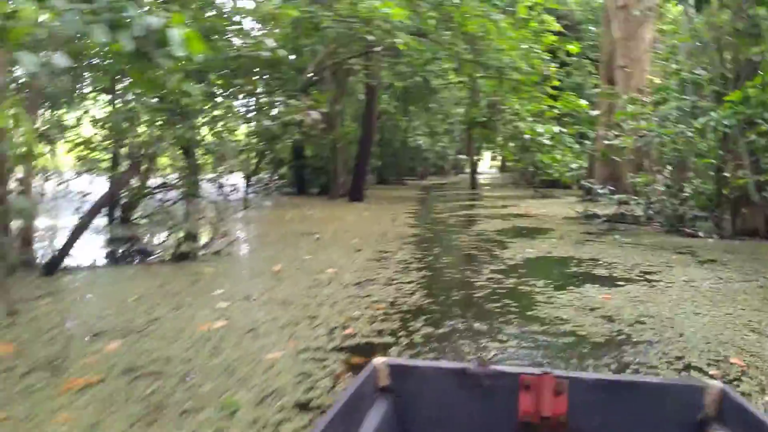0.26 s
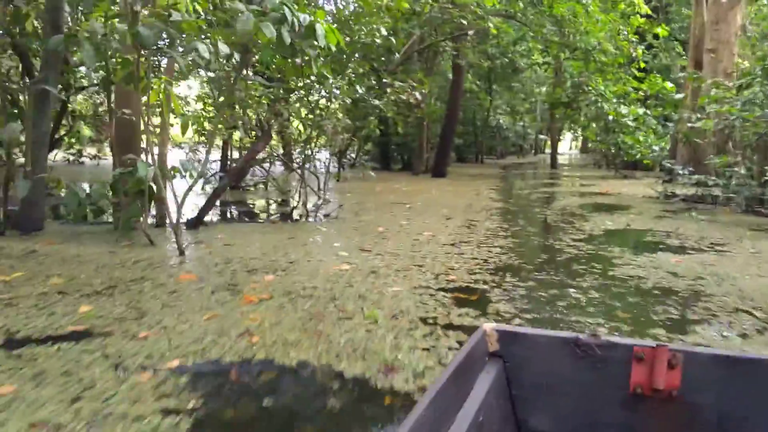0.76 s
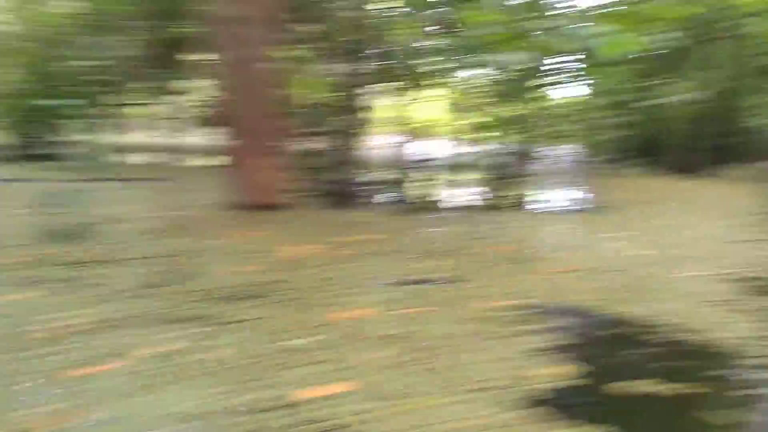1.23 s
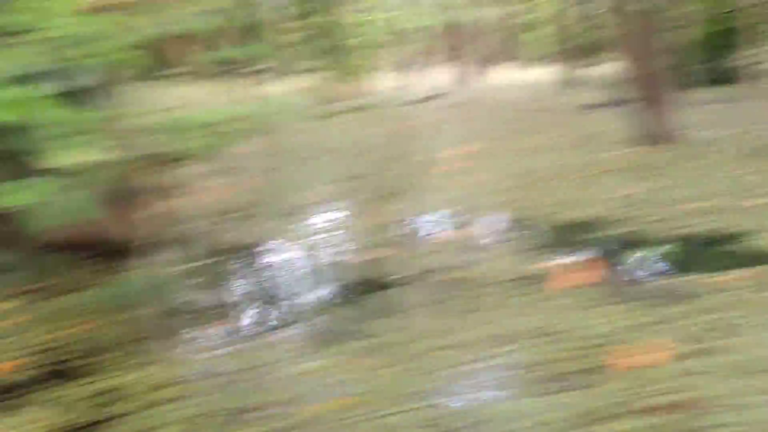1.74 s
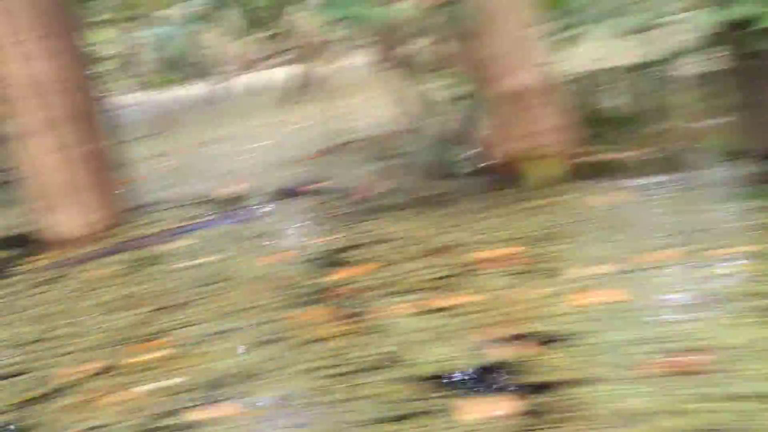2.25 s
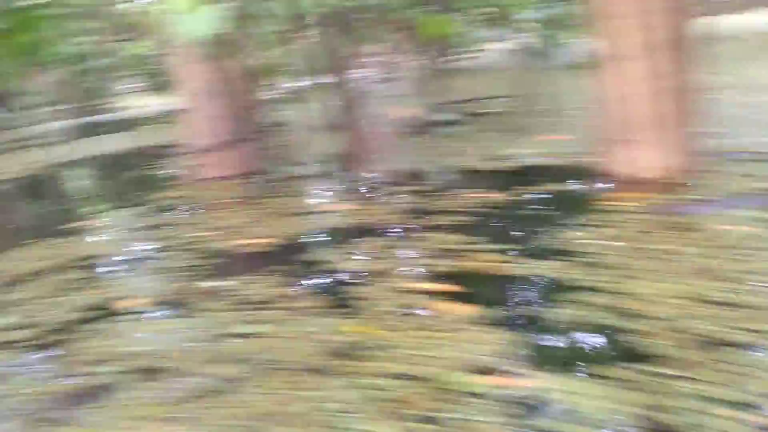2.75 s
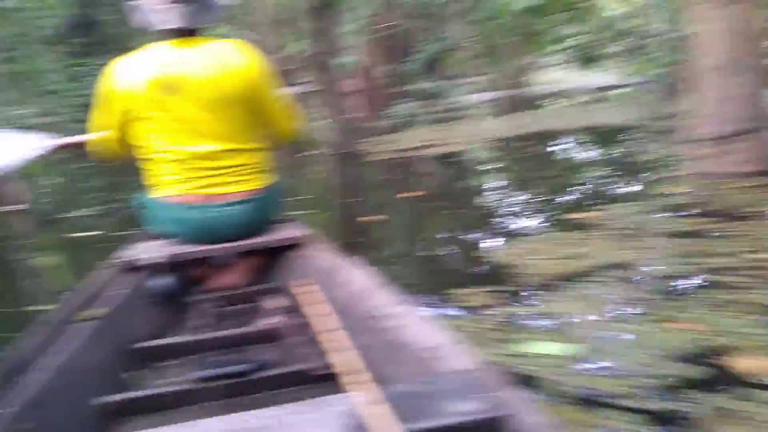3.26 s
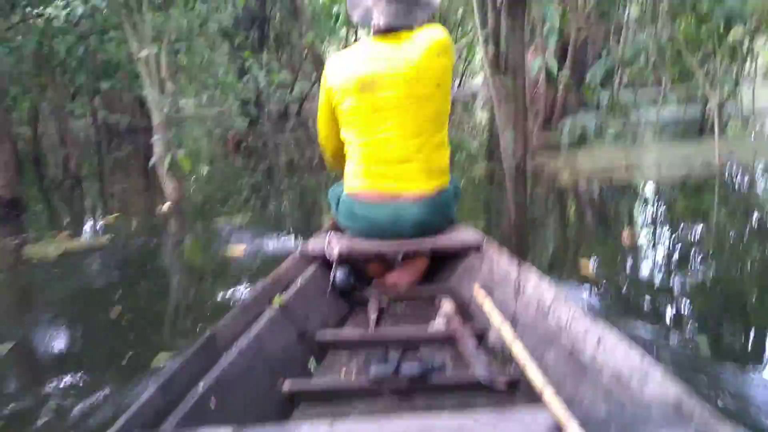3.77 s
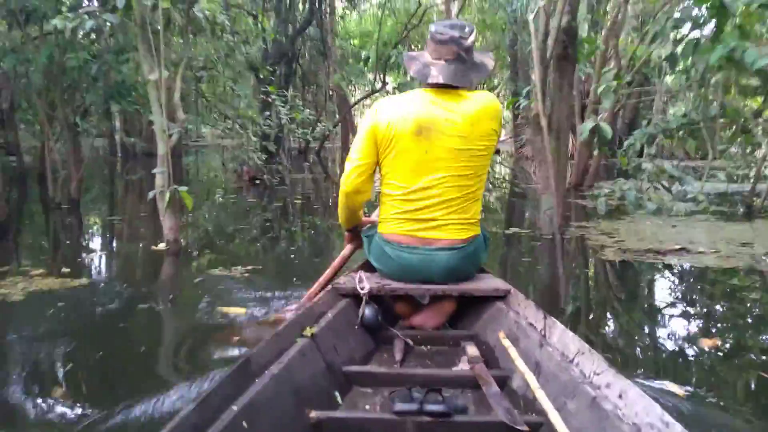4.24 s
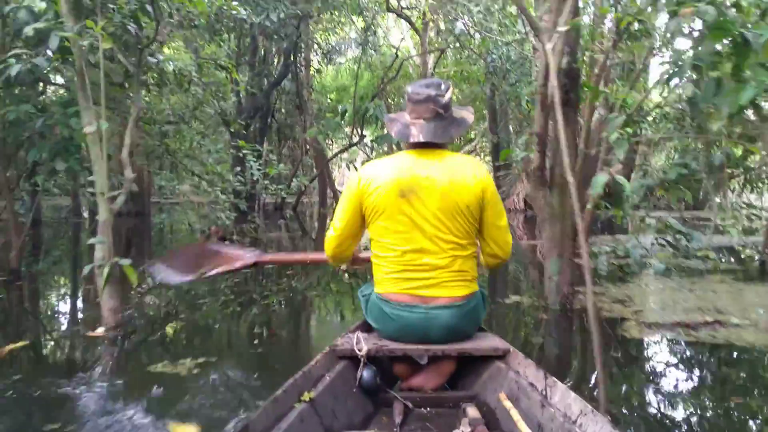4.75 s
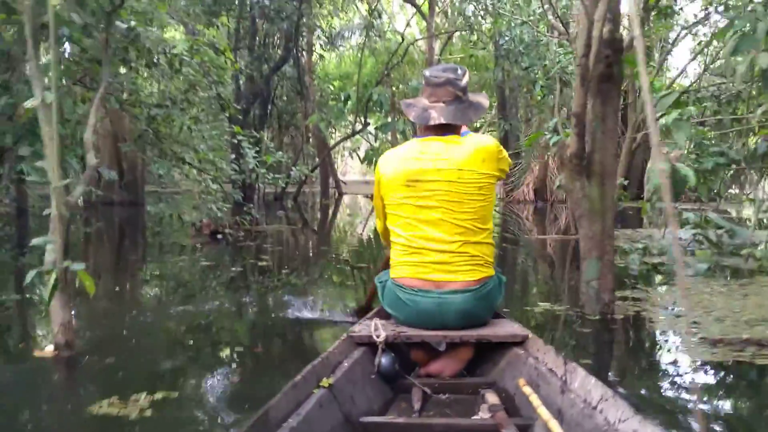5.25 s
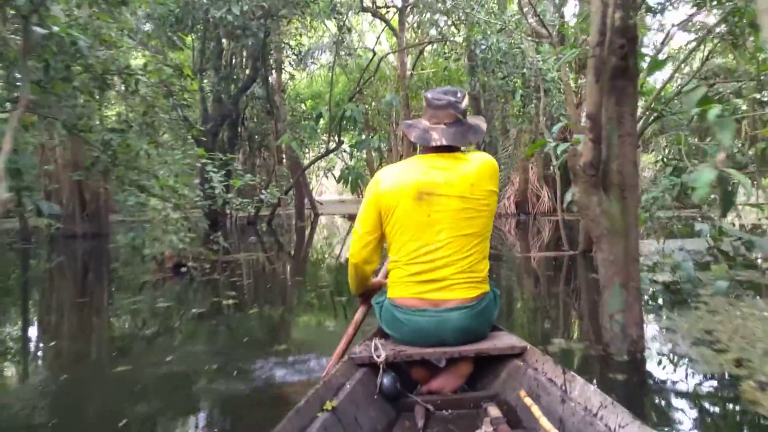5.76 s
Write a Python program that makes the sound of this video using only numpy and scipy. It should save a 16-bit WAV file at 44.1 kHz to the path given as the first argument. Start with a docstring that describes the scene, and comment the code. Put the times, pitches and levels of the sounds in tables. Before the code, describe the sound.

A canoe moves through a flooded forest. A high, steady cicada drone, mostly on the left, hangs over soft trickling water and a few faint high chirps. Midway the hand-held microphone is bumped by fingers, and the water grows closer and fuller. A paddle knocks the wooden hull, water sloshes, bubbles and drips, wind puffs low at the microphone, then a second knock and a distant falling whistle.

```python
"""In a flooded forest, a canoe is paddled past a hand-held camera microphone with two ports.
Close by, shaped grainy noise makes wash, spray and splashes; rising sines make bubbles and drips.
The shaft knocks the hull as ringing modes. Far off, cicadas drone as narrow noise and two birds sing as tones.
Slow noise is air at the ports, short pulses are finger touches; sharp peaks duck the gain, which creeps back."""
import sys
import numpy as np
from scipy import signal
from scipy.fft import rfft, irfft, next_fast_len
from scipy.io import wavfile
from scipy.ndimage import uniform_filter1d, map_coordinates

SR = 44100
rng = np.random.default_rng(int(sys.argv[2]) if len(sys.argv) > 2 else 0)


def unload_audio(sound):
    """Save the sound as a 16-bit wav file, at the path given as the first command line argument."""
    columns = np.transpose(np.atleast_2d(sound))
    # keep every value between -1 and 1, then stretch to whole-number steps
    steps = np.round(np.clip(columns, -1, 1) * 32767)
    wavfile.write(sys.argv[1], SR, steps.astype(np.int16))


N = 264644
T = np.arange(N) / SR

# water stirred by hull and blade, before trims and flicker: start_s, wash_db, spray_db
STIRRED_WATER = [(0, -57, -56.5), (.9, -57, -59), (1.7, -62, -58), (2.12, -59, -54.5), (2.62, -54, -55),
                 (2.9, -50, -46), (3.3, -47, -48.5), (3.75, -47.5, -48.5), (3.9, -44, -51.5),
                 (4.3, -49, -59), (4.4, -43.5, -49.5), (4.85, -53.5, -43), (5.08, -50, -55.5),
                 (5.2, -47.5, -45.5), (5.55, -55, -52), (6, -54.5, -51.5)]
# likeness of the near water at the two ports: frequency_hz, likeness (1 = the same, 0 = unrelated)
WATER_LIKENESS = [(100, 1), (1000, 0.12), (4000, 0), (9000, 0.027)]


def amp(db):
    """Decibels to an amplitude factor."""
    return 10 ** (np.asarray(db) / 20)


def unit(x):
    """Scale each channel to an rms of 1."""
    return x / np.sqrt(np.mean(x ** 2, axis=-1, keepdims=True) + 1e-20)


def along(points, hz):
    """Read a curve of (Hz, value) points on a log frequency axis."""
    point_hz, value = np.transpose(points)
    return np.interp(np.log(hz + 1), np.log(point_hz + 1), value)


def curves(rows):
    """One value per sample for each column after the time."""
    s, *columns = np.transpose(rows)
    return [np.interp(T, s, column) for column in columns]


def wobble(rate):
    """A smooth random curve with rate knots a second."""
    knots = rng.standard_normal(int(N * rate / SR) + 4)
    return map_coordinates(knots, [T * rate])


def filtered(x, response):
    """Shape x by a response given as a function of frequency."""
    m = next_fast_len(N + SR // 2)
    spectrum = rfft(x, m) * response(np.fft.rfftfreq(m, 1 / SR))
    return irfft(spectrum, m)[..., :N]


def rush(source, spectrum, alike):
    """Colour two unrelated sources and blend them to a likeness between ports; rms 1 per port."""
    def colour_and_weigh(hz):
        turn = np.arccos(np.clip(along(alike, hz), -1, 1)) / 2
        return amp(along(spectrum, hz)) * [np.cos(turn), np.sin(turn)]

    mid, side = filtered(source, colour_and_weigh)
    return unit(np.array([mid + side, mid - side]))


def grainy(spike_db):
    """Noise whose level in dB jumps by smoothed, capped exponential draws, like dense droplets."""
    spikes = np.minimum(uniform_filter1d(rng.exponential(size=(2, N)), size=12), 2)
    return rng.standard_normal((2, N)) * amp(spike_db * spikes * 3)


def port_gains(db, pan_db):
    """Left and right gains around a level; pan_db is left minus right."""
    return amp([[db + pan_db / 2], [db - pan_db / 2]])


def add(out, s, sound):
    """Mix a sound in at time s."""
    part = out[:, round(s * SR):][:, :sound.shape[1]]
    part += sound[:, :part.shape[1]]


def water():
    """Near wash and spray are grainy noise that swells in lumps over a steady far hush."""
    # relative spectra, all: frequency_hz, level_db (per Hz); the hush is far leaves and water
    wash_spectrum = [(150, 14), (300, 7.5), (600, 10.5), (1000, 9), (1600, 0), (2500, 6), (3500, -4),
                     (5000, -12.5), (9000, -20)]
    spray_spectrum = [(2000, -1.5), (4500, -0.5), (8300, 1.5), (10500, -1), (13000, -12), (16000, 0.5)]
    hush_spectrum = [(300, 3), (600, 2.5), (2500, -26), (5500, -4), (9000, -18.5)]
    wash_db, spray_db = curves(STIRRED_WATER)
    lumps = wobble(30)
    wash_level = amp(wash_db - 2.0 + 3.75 * lumps + 0.4 * wobble(7))
    wash = wash_level * rush(grainy(3.8), wash_spectrum, WATER_LIKENESS)
    flicker_db = 1.2 * lumps + 1.8 * wobble(60) + 1.5 * wobble(9)
    spray = amp(spray_db + flicker_db) * rush(grainy(3.6), spray_spectrum, WATER_LIKENESS)
    spray = spray * amp([[1.5], [-3.5]])  # stronger on the left
    hush = amp(-65.5) * rush(rng.standard_normal((2, N)), hush_spectrum, [(1000, 0.017)])
    return wash + spray + hush


def cicadas():
    """A far narrow-band chorus, mostly left, has a faint tymbal beat; other insects fringe it."""
    # chorus loudness at the left port, before flicker: start_s, level_db
    chorus_level = [(0.0, -36), (2.0, -39), (2.7, -42.5), (3.5, -41), (4.0, -42), (5.0, -38.5), (6.0, -40)]
    # relative spectra, chorus then other insects: frequency_hz, level_db (per Hz)
    chorus_spectrum = [(5500, -64), (6300, -9.5), (6700, -5), (6950, -0.5), (7300, -1.5), (7500, -5.5),
                       (7750, -28.5), (8600, -29.5), (10500, -48)]
    fringe_spectrum = [(5500, -39), (6000, -9.5), (6400, 1), (7200, -26), (8900, -24), (9300, -6),
                       (9550, -16), (10000, -34)]
    level_db, = curves(chorus_level)
    beat_hz = 86 + 3 * wobble(8.0)
    beat = 1 + 0.086 * np.sin(2 * np.pi * np.cumsum(beat_hz) / SR)
    chorus = rush(beat * rng.standard_normal((2, N)), chorus_spectrum, [(7000, 0.23)])
    chorus_gain = amp(level_db + 0.81 * wobble(5.97) + 0.82 * wobble(45))
    # the fringe fades by 9 dB while the camera turns away
    fringe_gain = amp(-49.5 - np.interp(T, (1.7, 2.6), [0, 9]))
    fringe = fringe_gain * rush(rng.standard_normal((2, N)), fringe_spectrum, [(7000, 0.092)])
    return (chorus_gain * chorus + fringe) * amp([[0], [-11]])


def air():
    """Breeze moves the ports partly together, puffs partly oppositely; a steady rumble is nearly common."""
    # light air over the ports, before pan and lumps: start_s, level_db
    breeze_level = [(0, -53), (1.5, -49.5), (3.5, -52.5), (4.6, -54), (6, -52)]
    # puffs at the ports, before lumps: start_s, length_s, level_db, left_minus_right_db
    puff_events = [(.27, 0.092, -47, -2), (1.142, 0.081, -45.5, -2), (1.816, 0.055, -47.5, 10),
                   (3.774, 0.084, -35, -12), (3.867, 0.14, -27, -7), (4.036, 0.1, -32, -8),
                   (4.196, 0.074, -28.5, 5)]
    # relative spectra, rumble (breeze too) then puffs: frequency_hz, level_db (per Hz)
    rumble_spectrum = [(30, -42), (55, 1.5), (90, 3), (112, -0.5), (136, 1.5), (170, -4.5), (350, -20),
                       (1000, -46.5)]
    puff_spectrum = [(35, -17), (55, 2.5), (120, -11.5), (300, -17), (1000, -58)]
    edge_s, breeze_left_db = 0.039, 3.5  # each puff's soft edges; breeze left minus right
    lumps = amp(2 * wobble(18) + 1.5 * np.array([wobble(12), wobble(12)]))
    breeze_gain = amp(curves(breeze_level)[0] + breeze_left_db * np.array([[.5], [-.5]]))
    breeze = breeze_gain * rush(rng.standard_normal((2, N)), rumble_spectrum, [(60, 0.7)])
    swell = np.zeros((2, N))
    for s, length, db, pan_db in puff_events:
        inside_s = np.minimum(T - s, s + length - T)  # negative outside the puff
        swell += port_gains(db, pan_db) * np.clip(inside_s / edge_s + 1, 0, 1) ** 2
    puffs = swell * rush(rng.standard_normal((2, N)), puff_spectrum, [(60, -0.34)])
    rumble = amp(-46.0) * rush(rng.standard_normal((2, N)), rumble_spectrum, [(60, 0.96)])
    return (breeze + puffs) * lumps + rumble


def bubble(hz, cycles, rise):
    """A bubble rings down as its pitch climbs; low ones last fewer cycles and climb further."""
    cycles = cycles * hz / (hz + 400)
    rise = rise * (400 / hz) ** 1.5
    u = T[:int(3 * cycles / hz * SR)] * hz  # time in cycles of the starting pitch
    tone = np.sin(2 * np.pi * u * (1 + rise * u / cycles / 2))
    return tone * (1 - np.exp(-u / 0.8)) * np.exp(-2 * u / cycles)


def bubbles():
    """Strewn bubbles follow the wash level; distinct low plops to high ticks each have six weaker neighbours."""
    # distinct bubbles and droplets, low plops to high ticks: start_s, pitch_hz, level_db
    distinct_bubbles = [(0.262, 1082, -42.5), (0.359, 258, -36.5), (0.784, 557, -44), (1.001, 1030, -44.5),
                        (1.43, 370, -43), (1.588, 399, -40.5), (2.055, 676, -41.5), (2.09, 715, -47),
                        (2.152, 465, -46), (2.298, 492, -41), (2.72, 622, -36), (2.828, 256, -26.5),
                        (2.838, 1470, -44), (3.03, 201, -34.5), (3.096, 607, -36), (3.123, 3160, -40.5),
                        (3.259, 2950, -40.5), (3.263, 866, -42), (3.312, 2090, -55), (3.317, 1530, -40),
                        (3.331, 1100, -42), (3.349, 5500, -36), (3.412, 1430, -36.5), (3.416, 637, -39.5),
                        (3.457, 1560, -36), (3.611, 1365, -36), (3.99, 196, -28.5), (4.343, 920, -32.5),
                        (4.402, 913, -33.5), (4.468, 490, -32), (4.5, 646, -31.5), (4.574, 1050, -35),
                        (5.228, 1100, -40), (5.25, 245, -32), (5.402, 1200, -42)]
    neighbour_db = -11
    out = np.zeros((2, N))
    # the strewn bubbles' loudness swells in clumps
    clump_db = curves(STIRRED_WATER)[0] + 4 * wobble(8)

    def lean(pan):
        return np.array([[3], [-3]]) * (2 * pan - 1)

    for u, pitch, strength, pan in rng.random((1200, 4)):
        s = u * T[-1]
        level_db = clump_db[int(s * SR)] - 5.5 - 2.9 * np.log(1 - .93 * strength)
        add(out, s, amp(level_db + lean(pan)) * bubble(260 * 7 ** pitch, 23.0, 0.226))
    for s, hz, db in distinct_bubbles:
        add(out, s, amp([[db], [db]]) * bubble(hz, 19.4, 0.245))
        for later, pitch, pan in rng.random((6, 3)):
            neighbour = bubble(hz * 2.5 ** (pitch - .5), 15.0, 0.28)
            add(out, s + 0.05 * later, amp(db + neighbour_db + lean(pan)) * neighbour)
    return out


def splashes():
    """Slaps of water are grainy bursts, nearly two octaves wide, that start at once and die away."""
    # sudden slaps: start_s, centre_hz, level_db, t60_s (time to fall 60 dB)
    slaps = [(.255, 673, -47.5, 0.47), (0.791, 600, -42, 0.24), (.85, 3550, -54.5, 0.7),
             (1.992, 3300, -47.5, 0.6), (2.096, 6460, -41.5, 0.25), (2.5, 7360, -46, 0.19),
             (3.553, 7700, -37, 0.32), (4.328, 750, -47.5, 0.51), (4.472, 640, -35.5, 0.21),
             (5.16, 7700, -45, 0.67), (5.829, 9400, -46.5, 0.15)]
    out = np.zeros((2, N))
    for s, hz, db, t60 in slaps:
        band = [(hz / 6, -40), (hz / 2.6, -3), (hz, 0), (hz * 1.32, -3), (hz * 6, -40)]
        since = np.clip(T - s, 0, None)
        level = amp(db - 60 * since / t60) * (1 - np.exp(-since / 0.0003))
        out += level * rush(grainy(3.2), band, WATER_LIKENESS)
    return out


def forest(x, t60):
    """Echoes off the trunks are a decaying noise tail, different at each port."""
    t = T[:SR]
    tail = rng.standard_normal((2, len(t))) * amp(-60 * t / t60)
    return signal.fftconvolve(x[None], tail / np.linalg.norm(tail[0]), axes=1)[:, :N]


def birds():
    """A falling whistle, warbling more towards its end, and short high notes are far pure tones with echo."""
    # one whistle's shape: after_s, pitch_hz, level_db (relative)
    whistle_shape = [(0, 1870, -12), (.03, 1890, -5), (.036, 2310, 2), (.058, 2290, 2), (.085, 2150, 3),
                     (.125, 2060, 1), (.4, 2000, -2), (.5, 1930, -5), (.6, 1790, -9), (.76, 1680, -19)]
    # whistles, a base for the shape's level: start_s, level_db
    whistle_calls = [(0.351, -52.5), (5.281, -43.5)]
    # short high notes, before pan and echo: start_s, level_db
    chip_calls = [(.305, -56), (0.687, -51), (.79, -57), (1.578, -49), (2.604, -36.5), (2.945, -45),
                  (4.688, -47)]
    warble_hz, warble_rate_hz, chip_hz = 75, 22, 4102  # warble depth at the end; starting pitch of a chip
    song = np.zeros((1, N))
    after, hz, db = np.transpose(whistle_shape)
    t = T[:int(after[-1] * SR)]
    for s, level_db in whistle_calls:
        flutter_db = 2.8 * wobble(40)[:len(t)]
        warble = warble_hz * (t / t[-1]) ** 2 * np.sin(2 * np.pi * warble_rate_hz * t)
        pitch = np.interp(t, after, hz) + warble
        tone = np.sin(2 * np.pi * np.cumsum(pitch) / SR)
        add(song, s, amp(level_db + flutter_db + np.interp(t, after, db)) * tone[None])
    whistle_echo = forest(song[0], 0.8)  # a longer tail for the whistles alone
    for s, level_db in chip_calls:
        c = T[:int(.035 * SR)]
        tone = np.sin(2 * np.pi * chip_hz * c * (1 + 0.087 * c))
        add(song, s, amp(level_db) * np.sin(np.pi * c / c[-1]) * tone[None])
    return song * amp([[1], [-5]]) + amp(-9) * (whistle_echo + forest(song[0], 0.42))


def taps():
    """A finger pushes one port in; it rebounds by half cycles, with a noisy tick and a casing thump."""
    # touches: start_s, port (-1 left, 1 right), click_db, click_hz, rebound (0-1 per half cycle), thump_db
    touches = [(2.5255, -1, -12.5, 590, 0.11, -4.5), (2.6395, -1, -38, 500, 0, -18.5),
               (2.8136, -1, -20, 2166, 0, -62), (2.9786, -1, -14.5, 2520, 0.13, -23),
               (3.1397, -1, -21.5, 2094, 0.4, -30), (3.455, 1, -18.5, 1180, 0.01, -21),
               (3.8027, 1, 2.5, 1600, 0.09, -17), (3.9536, 1, -12, 1484, 0.45, -38),
               (3.9576, 1, -13, 690, 0.1, -40), (4.0092, 1, -10.5, 1880, 0.02, -3.5),
               (4.0121, 1, -9.5, 1360, 0.07, -40), (5.5961, 1, -11.5, 2760, 0.37, -44),
               (5.6408, 1, -10, 1470, 0.03, -57)]
    tick_db, tick_t60 = -29, .003  # relative to the click; seconds
    out, t = np.zeros((2, N)), T[:SR // 12]
    for s, port, db, hz, rebound, thump_db in touches:
        ringing = np.clip(rebound, .02, .9) ** (2 * hz * t - .5)
        click = -np.sin(2 * np.pi * hz * t) * ringing * (1 - np.exp(-8 * hz * t))
        tick = amp(tick_db - 60 * t / tick_t60) * np.diff(rng.standard_normal(len(t) + 1))
        thump = np.sin(2 * np.pi * 140 * (t - .0008)) * amp(-60 * t / 0.023) * (1 - np.exp(-t / 0.0011))
        touched = np.array([[port < 0], [port > 0]])
        add(out, s, touched * (amp(db) * (click + tick) + amp(thump_db) * thump))
    return out


def drips():
    """Each drop off the lifted blade opens a ragged cavity whose pitch sweeps up as it quickly closes."""
    # drops: start_s, starting_pitch_hz, level_db
    drops = [(3.41, 2050, -51), (4.364, 620, -26.5), (4.639, 780, -34.5), (4.641, 1270, -38),
             (4.702, 956, -35), (4.783, 1073, -44), (4.991, 890, -35.5)]
    life_s, climb = .012, .22  # climb is the share of pitch gained over one life
    out, t = np.zeros((2, N)), T[:SR // 20]
    for s, hz, db in drops:
        ragged = 1 + .5 * unit(uniform_filter1d(rng.standard_normal(len(t)), size=50))
        sweep = np.sin(2 * np.pi * hz * t * (1 + climb * t / life_s / 2)) * ragged
        level = (1 - np.exp(-hz * t / 2)) * np.exp(-(t / life_s) ** 2)
        add(out, s, amp([[db], [db]]) * sweep * level)
    return out


def knocks():
    """The shaft strikes the planks: a noisy crack and hull modes that die within hundredths of a second."""
    # shaft on hull: start_s, level_db, left_minus_right_db
    strikes = [(3.54, -7, 2.5), (5.1566, -8.5, 6)]
    # modes of the planks: pitch_hz, level_db (relative to the strike), t60_s
    hull_modes = [(282, -23, 0.058), (573, -14, 0.015), (960, -10, 0.011), (1296, -13, 0.0094)]
    out, t = np.zeros((2, N)), T[:SR // 8]
    for s, db, pan_db in strikes:
        ring = sum(amp(level - 60 * t / t60) * np.sin(2 * np.pi * hz * t) for hz, level, t60 in hull_modes)
        crack = 0.054 * amp(-60 * t / 0.031) * rng.standard_normal((2, len(t)))
        add(out, s, port_gains(db, pan_db) * (crack - ring))
    return out


def scene():
    """Near water and knocks, with the knocks echoing off the trunks, among insects, birds, air and touches."""
    hits = knocks()
    hit_echo = amp(-12.5) * forest(hits[0], 0.23)
    near = water() + splashes() + bubbles() + drips() + hits + hit_echo
    return near + cicadas() + birds() + air() + taps()


def record(dry):
    """Each channel subtracts a late, dulled copy of the other port; sharp peaks duck the gain, which creeps back."""
    # share of the other port: frequency_hz, level_db
    cross_share = [(50, -2), (1000, -3.5), (2200, -0.5), (4400, -1.7), (7000, -6.5), (9000, -24)]
    port_lag_s, top_hz, release_s = 20.5 / SR, 15480, 0.71

    def cross(hz):
        return amp(along(cross_share, hz)) * np.exp(-2j * np.pi * hz * port_lag_s)

    both = dry - filtered(dry[::-1], cross)
    sharp = np.abs(filtered(both, lambda hz: hz / (hz + 1500))).max(axis=0)
    need_db = np.clip(0.78 * (20 * np.log10(sharp + 1e-9) + 22), 1e-3, None)  # acts on peaks above -22 dB
    # hold the largest need while it decays exponentially
    release = T / release_s
    duck_db = np.exp(np.maximum.accumulate(np.log(need_db) + release) - release)
    # the control reacts a moment after the peak
    late_db = uniform_filter1d(np.pad(duck_db, (60, 0))[:N], size=40)

    def top_end(hz):
        shelf = amp(np.interp(hz, [14150, 14400], [0, -36]))  # only strong clicks show in the last kilohertz
        return shelf * (hz < top_hz)

    return filtered(both * amp(-late_db), top_end)


dry = scene()
out = record(dry)
unload_audio(out)
```